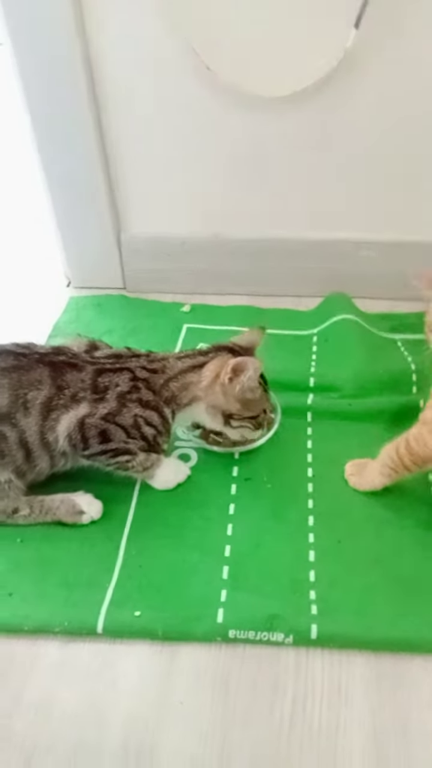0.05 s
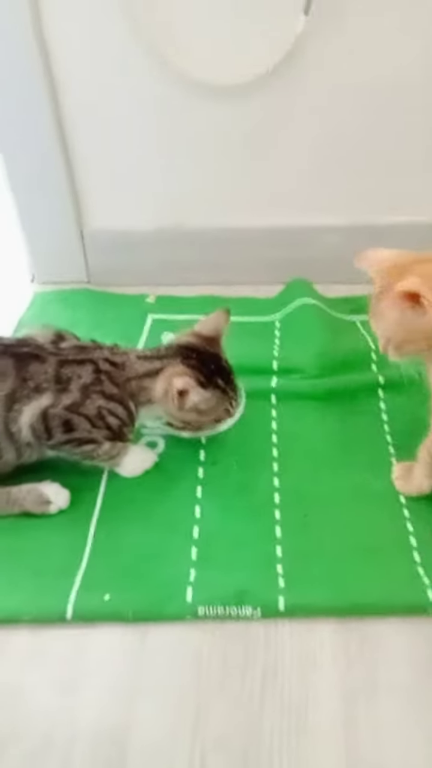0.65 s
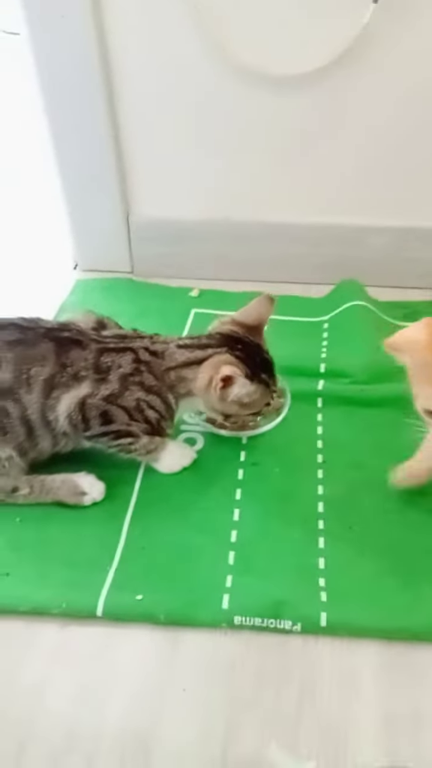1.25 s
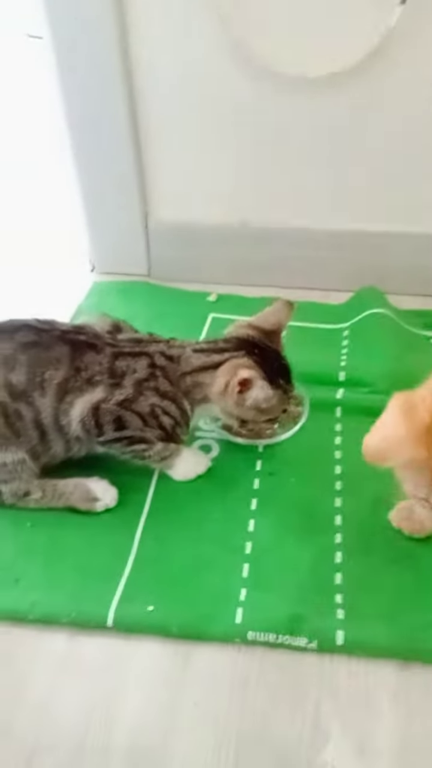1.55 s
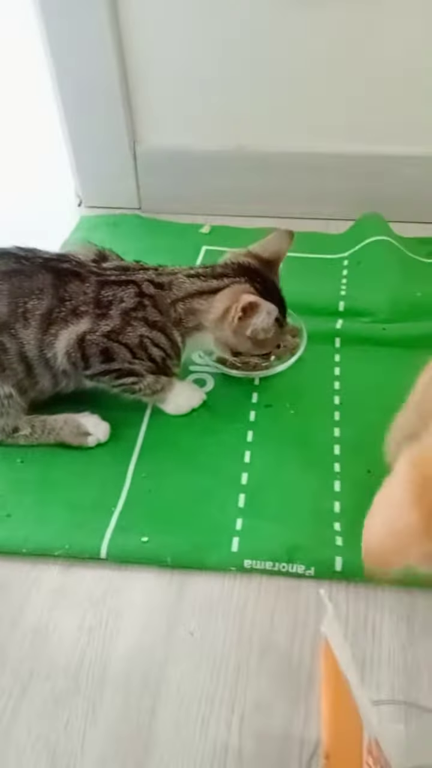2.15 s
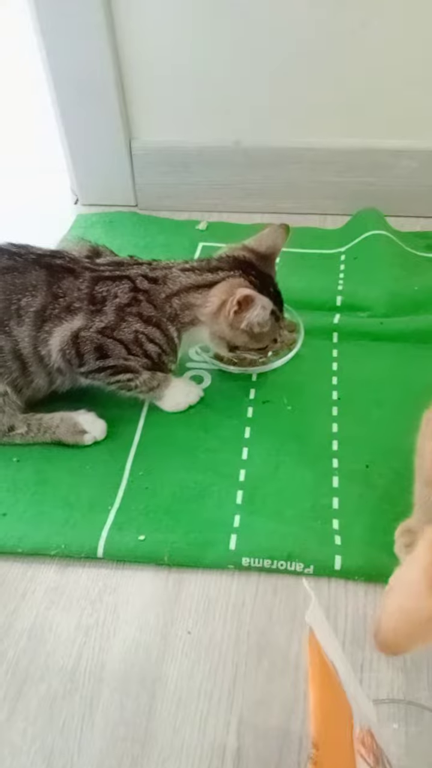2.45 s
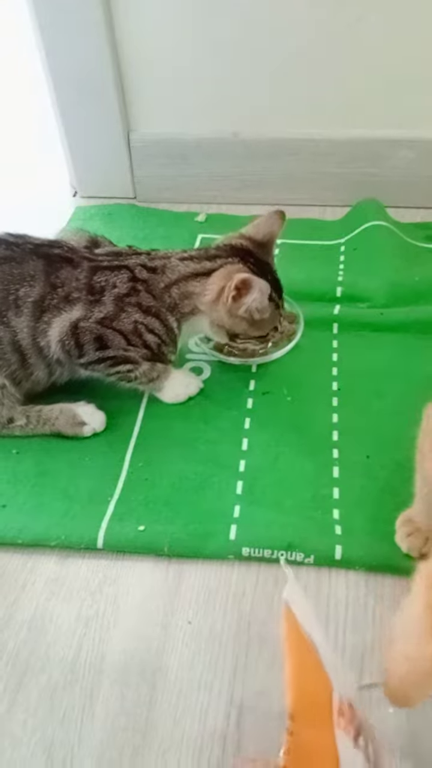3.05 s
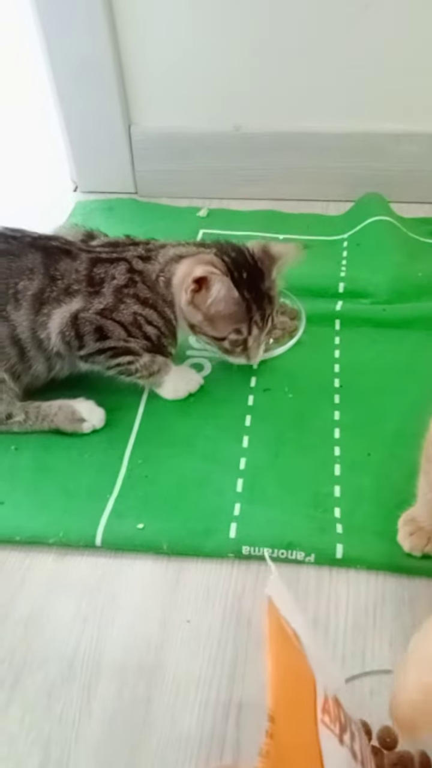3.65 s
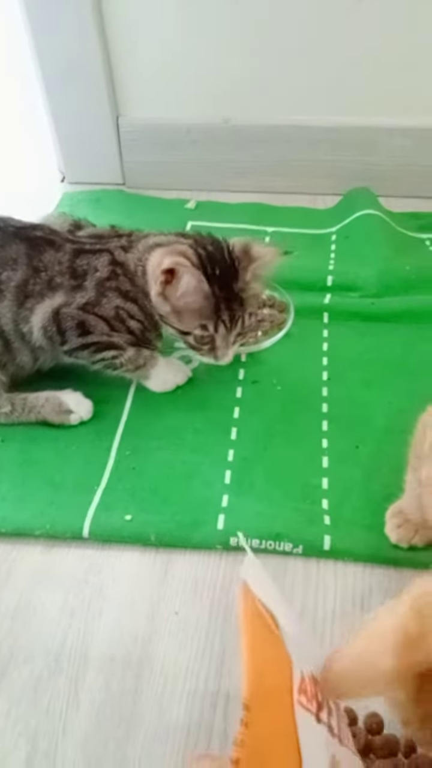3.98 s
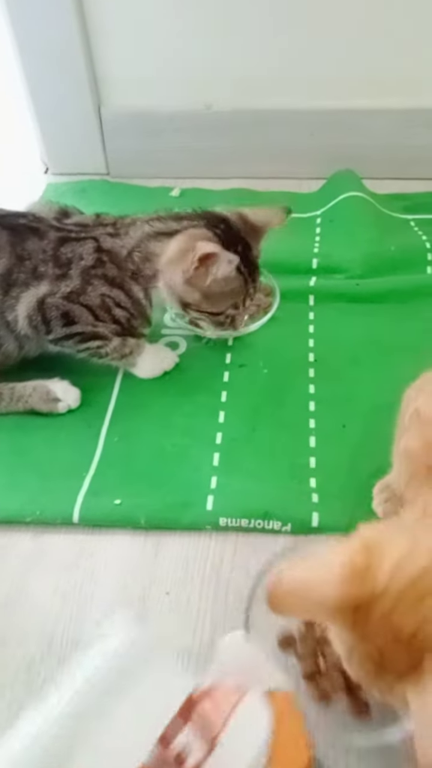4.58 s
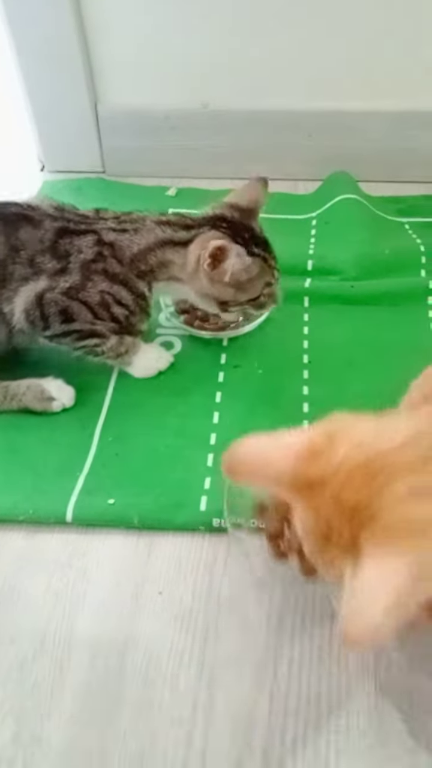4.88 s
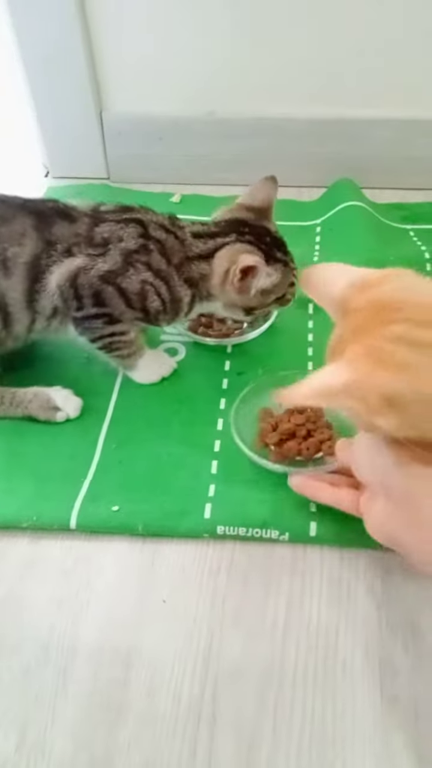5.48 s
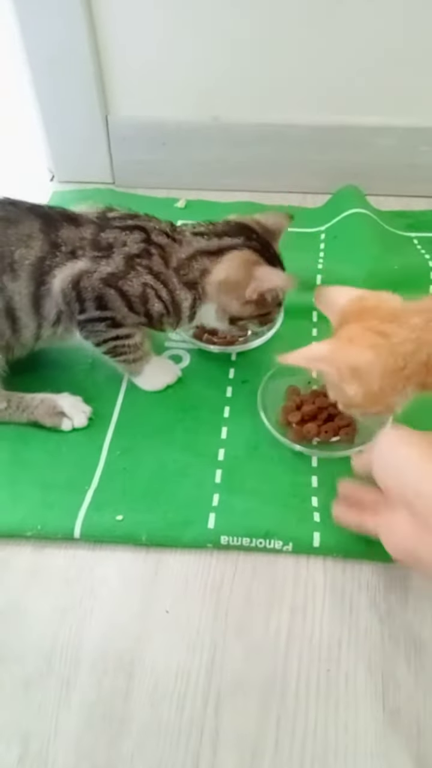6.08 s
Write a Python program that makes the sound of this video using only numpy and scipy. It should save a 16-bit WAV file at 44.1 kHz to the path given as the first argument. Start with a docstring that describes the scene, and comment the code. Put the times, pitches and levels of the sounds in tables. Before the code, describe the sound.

A stiff plastic bag rustles, then crinkles and pops sharply as it is tipped. Dry cat food scrapes along the plastic and drops into a small glass bowl, each pellet ticking with a short, bright ring. The pour thins out, and a few light knocks and faint rustles follow as the bag is put aside and the bowl is carried. The microphone picks up slight echoes and a steady hush from a bare room.

```python
"""Dry cat food pours from a stiff plastic bag into a small glass bowl: each pellet ticks and rings the glass.
The kibble scrapes along the film and drums on the bag wall; folds crinkle and the wall pops as it buckles.
Then the bag is put aside and the bowl is carried to a mat, with a few knocks and a faint rumble.
A bare, hard-walled room adds echoes and a steady hush."""
import sys
import numpy as np
from scipy import signal
from scipy.fft import rfft, irfft, next_fast_len
from scipy.io import wavfile
from scipy.ndimage import uniform_filter1d

SR = 44100
rng = np.random.default_rng(int(sys.argv[2]) if len(sys.argv) > 2 else 0)


def output_pcm(signal):
    """Save a mono or channel-first signal as 16-bit PCM at the path in sys.argv[1].

    Samples are clipped to [-1, 1] before scaling.
    """
    pcm = np.clip(np.atleast_2d(signal).T, -1, 1) * 32767
    wavfile.write(sys.argv[1], SR, np.round(pcm).astype(np.int16))


N = 278735
TIME_S, HIT_TIME_S = np.arange(N) / SR, np.arange(SR // 8) / SR
CUTOFF_HZ = 15700


# Glass modes, each split into a pair by the uneven wall: pitch_hz, split_hz, base_t60_s
BOWL_MODES = [(2175, 60, .06), (5020, 45, .06), (8625, -45, .05), (10127, -45, .05), (12200, -130, .045),
              (15224, -60, .055)]
# Relative strength of each mode by spot struck: bottom_db, rim_db
MODE_RESPONSE = [(-14.5, -15), (9, -40.5), (0.5, -29.5), (-27, 5.5), (-17, -9), (-11, -22)]
# Pellet tick spectrum: freq_hz, gain_db
TICK_SPECTRUM = [(300, -48), (800, -53), (1500, -15), (2200, 1), (3600, 1.5), (5500, -4.5), (8000, -5.5),
                 (9700, 1.5), (11500, -28), (15500, -14)]
# Pellets on glass, levels before trim: start_s, tick_db, ring_db, spot (0 bottom, 1 rim)
PELLET_HITS = [(1.9577, -38.5, -30, 0.06), (2.0382, -40, -53, 0.47), (2.0829, -55, -28, 0.67),
               (2.0994, -41.5, -30, 0.88), (2.202, -38, -31.5, 0.54), (2.4567, -36.5, -24.5, 1),
               (2.5097, -35, -34.5, .02), (2.5736, -50, -40.5, .05), (2.612, -49.5, -39, 0.052),
               (2.6785, -47, -38.5, 0.65), (2.7107, -44.5, -42, 0.4), (2.7365, -47.5, -34.5, 1),
               (2.758, -51, -46, .8), (2.9553, -45, -46.5, .85), (3.019, -40, -29, 0.38),
               (3.0645, -46, -42, 0.84), (3.162, -39, -40.5, 0.44), (3.249, -44.5, -37.5, 0.061),
               (3.3013, -43, -33, 1), (3.364, -52, -45, 0.83), (3.406, -51.5, -37, 1), (3.418, -57, -38, 1),
               (4.001, -45.5, -47.5, .75), (4.0771, -40, -43.5, 0.26), (4.1856, -49.5, -50, 0.16)]


def pellet_clinks(tick_trim_db=2.5, ring_trim_db=-1.0, scatter_db=3.0, twin_gain=0.66, t60_scale=0.73):
    """A pellet ticks and sets the bowl's paired modes beating; the spot it hits decides their balance."""
    out, t = np.zeros(N), HIT_TIME_S
    bottom_db, rim_db = np.transpose(MODE_RESPONSE)
    onset = 1 - np.exp(-t / 0.00039)
    for start_s, tick_db, ring_db, spot in PELLET_HITS:
        contact = crack_burst(t60_s=0.017, ragged_db=6.5, first_gain=1.7)
        tick = bandpass(colour(contact, TICK_SPECTRUM), 320, 10000)
        clink = from_db(tick_db + tick_trim_db) * unit_attack(tick)
        shares = from_db(bottom_db + spot * (rim_db - bottom_db) + rng.normal(0, scatter_db, len(rim_db)))
        for (hz, split_hz, t60_s), share in zip(BOWL_MODES, shares / np.linalg.norm(shares)):
            twin = twin_gain * np.sin(2 * np.pi * ((hz + split_hz) * t + rng.random()))
            pair = (np.sin(2 * np.pi * hz * t) + twin) * decay(t, t60_s * t60_scale) * onset
            clink += share * from_db(ring_db + ring_trim_db) * unit_attack(pair)
        add(out, start_s, clink)
    return out


# Ring of each bowl mode at unit flow: level_db
PATTER_LEVELS = [-62, -68.5, -68.5, -61.5, -72, -70]


def bowl_patter(rate_per_s=41, spread_db=5.5):
    """Pellets roll and resettle in the bowl; each touch strikes every mode with a strength of its own."""
    touches = (rng.random(N) < rate_per_s / SR) * contact_sizes(spread_db)
    glass = np.zeros(N)
    for (hz, _, t60_s), level_db in zip(BOWL_MODES, PATTER_LEVELS):
        glass += from_db(level_db) * unit_rms(ring(touches * rng.standard_normal(N), hz, t60_s))
    return glass * np.sqrt(kibble_flow()) * gate(start_s=1.95, end_s=4.2, fade_s=0.078)


# Strength of the kibble's sliding: time_s, relative_db
FLOW_CURVE = [(0, -74), (0.55, -70), (0.66, -57.5), (0.8, -67.5), (0.96, -54.5), (1.25, -57), (1.41, -49.5),
              (1.68, -48.5), (1.8, -36.5), (2.05, -43.5), (2.18, -39.5), (2.41, -59.5), (2.54, -46.5),
              (3.06, -43.5), (3.2, -49), (3.28, -39.5), (3.44, -53), (3.8, -51), (4.19, -56), (4.78, -60),
              (4.97, -56), (5.25, -58), (5.8, -62.5), (5.93, -56), (6.32, -61)]


def kibble_flow(rest_db=-67.5, steady_db=-45):
    """Flow of kibble, about 1 at a steady pour; below the resting level the pellets lie still."""
    motion = from_db(np.interp(TIME_S, *np.transpose(FLOW_CURVE)))
    return np.maximum(motion - from_db(rest_db), 0) / from_db(steady_db)


# Kibble scraping on film: freq_hz, gain_db
SCRAPE_SPECTRUM = [(60, -6.5), (160, -12), (240, -2), (350, -12.5), (560, -5), (780, -1), (1450, -3),
                   (2300, 0), (3500, 0), (5500, -3.5), (7800, -8.5), (9700, 3.5), (11200, -10),
                   (15500, -18)]


def kibble_slide(body_db=-55, rattle_db=-50, fizz_db=-54, wall_db=-57.5, click_db=-54.5, shared=0.53):
    """Pellets scrape over the film in a dense crackle, bump the bag wall and click against each other."""
    flow = kibble_flow()
    body_flow, fizz_flow = flow ** 0.85, flow ** 0.97
    registers = [(50, 1300, body_flow * from_db(body_db)),
                 (1300, 7000, flow * from_db(rattle_db)),
                 (7000, 16000, fizz_flow * from_db(fizz_db))]
    common_power = grain_power(rate_per_s=270, spread_db=6.5, t60_s=0.028)
    out = np.zeros(N)
    for low_hz, high_hz, gain in registers:
        own_power = grain_power(rate_per_s=600, spread_db=8.0, t60_s=0.022)
        crackle = np.sqrt(shared * common_power + (1 - shared) * own_power) * rng.standard_normal(N)
        out += gain * unit_rms(bandpass(colour(crackle, SCRAPE_SPECTRUM), low_hz, high_hz))
    out += body_flow * from_db(wall_db) * tumble(low_hz=517, high_hz=933, rate_per_s=100, cycles=33)
    out += flow * from_db(click_db) * tumble(low_hz=2080, high_hz=4000, rate_per_s=170, cycles=45)
    return out


def grain_power(rate_per_s, spread_db, t60_s):
    """Power of tiny random contacts, evened out to a mean near 1."""
    contacts = contact_sizes(spread_db, cap=4) ** 2 * (rng.random(N) < rate_per_s / SR)
    power = signal.lfilter([1], [1, -decay(2 / SR, t60_s)], contacts + 1e-9)
    return power / uniform_filter1d(power, size=SR // 14)


def tumble(low_hz, high_hz, rate_per_s, cycles):
    """Pellets bump each other or the bag wall, each ringing at one of 16 pitches; evened to rms 1."""
    bumps = contact_sizes(spread_db=4.0) * (rng.random(N) < rate_per_s / SR)
    pitches_hz = np.geomspace(low_hz, high_hz, 16)
    choice = rng.integers(0, len(pitches_hz), N)
    rings = sum(ring(bumps * (choice == k), hz, cycles / hz) * (-1) ** k
                for k, hz in enumerate(pitches_hz))
    power = uniform_filter1d(rings ** 2, size=SR // 10)
    return unit_rms(rings / np.sqrt(np.abs(power) + 0.1 * power.mean()))


# Bag film spectrum: freq_hz, gain_db
FILM_SPECTRUM = [(150, -18), (250, -2), (400, -10), (700, -6.5), (1300, -7), (2200, 1.5), (3600, 2),
                 (5500, -6.5), (7600, -12), (9700, -3.5), (11000, -15.5), (15500, -19)]
# Film snaps and handling scuffs: start_s, level_db, centre_hz, falloff_db_per_octave, t60_s
FILM_SNAPS = [(0.6165, -56.5, 1200, 7.5, 0.014), (0.6411, -51.5, 10800, 8, 0.023),
              (0.8572, -53.5, 1500, 2.5, .06), (0.9724, -43.5, 9100, 22, 0.013),
              (1.106, -55.5, 10700, 19, 0.017), (1.21, -39, 5750, 5, 0.022), (1.285, -44, 850, 10.5, .044),
              (1.318, -39.5, 10700, 9.5, 0.02), (1.4278, -39, 600, 7, 0.022),
              (1.5081, -39.5, 600, 4, 0.068), (1.5588, -41.5, 600, 2.5, 0.057),
              (1.6246, -48, 600, 3, 0.024), (1.67, -48, 12000, 3, .027), (1.7077, -18.5, 8000, 4, 0.029),
              (1.722, -39, 4550, 13, 0.093), (1.766, -35.5, 4560, 5, 0.024),
              (1.7857, -30.5, 2940, 4, 0.033), (1.791, -29, 10500, 13, 0.013),
              (1.8366, -40, 12000, 10, 0.031), (1.8691, -28.5, 9300, 15.5, 0.027),
              (1.872, -33.5, 8600, 32, 0.21), (1.9972, -38, 2900, 12, 0.0071),
              (2.0988, -28.5, 3080, 6, 0.032), (2.117, -32, 3000, 6, 0.048), (2.1557, -38, 9000, 3, .04),
              (2.16, -23.5, 7100, 3, .055), (2.296, -42, 9600, 4.5, 0.085), (2.364, -46, 600, 3.5, 0.031),
              (2.5878, -36, 3060, 4.5, 0.086), (2.8408, -40.5, 800, 7, 0.037),
              (2.851, -43, 784, 15.5, 0.048), (2.914, -48, 3200, 29, 0.048), (3.3952, -45, 900, -4, 0.04),
              (3.7466, -46, 10800, 1, 0.031), (4.266, -50.5, 800, 9, 0.12), (4.6055, -51, 814, 7.5, 0.049),
              (5.0752, -58, 600, 8.5, 0.068), (5.889, -50, 557, 6, 0.2), (6.052, -52, 9450, 12, 0.14),
              (6.064, -50, 4900, 17, 0.2), (6.1588, -54.5, 7100, 7, 0.011)]


def bag_crinkles():
    """Each fold that gives way cracks with the colour of the film, tilted about a pitch of its own."""
    out = np.zeros(N)
    grid_hz = np.geomspace(100, CUTOFF_HZ, 60)
    for start_s, level_db, centre_hz, falloff, t60_s in FILM_SNAPS:
        gains_db = at_hz(FILM_SPECTRUM, grid_hz) - falloff * np.abs(np.log2(grid_hz / centre_hz))
        burst = crack_burst(t60_s, ragged_db=1.5, first_gain=1.8)
        snap = colour(burst, np.column_stack([grid_hz, gains_db]))
        add(out, start_s, from_db(level_db) * unit_attack(bandpass(snap, 200, CUTOFF_HZ)))
    return out


# Hollow pops of the bag wall: start_s, peak_db, pitch_hz, t60_s
WALL_POPS = [(1.5031, -20, 595, 0.0099), (1.506, -39.5, 281, 0.047), (1.766, -33.5, 570, 0.031),
             (1.868, -40.5, 480, 0.022), (1.933, -35, 557, 0.043)]


def bag_pops(rise_s=0.00042):
    """The bag wall buckles and the air inside rings for a few cycles."""
    out, t = np.zeros(N), HIT_TIME_S
    onset = (1 - np.exp(-t / rise_s)) ** 2
    for start_s, peak_db, hz, t60_s in WALL_POPS:
        swing = -np.sin(2 * np.pi * hz * t) * decay(t, t60_s) * onset
        add(out, start_s, from_db(peak_db) * swing / np.abs(swing).max())
    return out


# Knocks of bag and bowl, levels before trim:
# start_s, crack_db, crack_t60_s, dull_above_hz, ring_cycles, 3 x (pitch_hz, mode_db)
HANDLING_HITS = [(3.7936, -31, 0.02, 6100, 7.5, 1540, -54.5, 2130, -33, 3480, -45),
                 (4.2812, -37, 0.019, 5200, 12, 1690, -42.5, 2060, -40.5, 3070, -46),
                 (4.8093, -68, 0.033, 12000, 30, 2160, -54, 10100, -58, 11200, -54),
                 (5.2022, -74, 0.053, 4000, 6.4, 1230, -47.5, 2400, -47.5, 4640, -49),
                 (5.223, -64, 0.15, 4040, 17, 1280, -52.5, 2800, -45, 5740, -40),
                 (5.3318, -53, 0.018, 6860, 56, 3030, -45, 4700, -54, 10700, -49),
                 (5.4683, -92, 0.095, 9000, 50, 4550, -71, 5000, -55, 5800, -54.5)]


def handling_knocks(crack_trim_db=1.0, ring_trim_db=0.6, dull_db_per_octave=12):
    """A rough hard contact excites three damped resonances; softer contacts lose their treble."""
    out = np.zeros(N)
    for start_s, crack_db, t60_s, dull_hz, cycles, *modes in HANDLING_HITS:
        contact = crack_burst(t60_s, ragged_db=0.5, first_gain=3.0)
        dulled = [(hz, db - dull_db_per_octave * max(np.log2(hz / dull_hz), 0))
                  for hz, db in FILM_SPECTRUM]
        crack = bandpass(colour(contact, dulled), 480, CUTOFF_HZ)
        knock = from_db(crack_db + crack_trim_db) * unit_attack(crack)
        for hz, mode_db in zip(modes[::2], modes[1::2]):
            knock += from_db(mode_db + ring_trim_db) * unit_attack(ring(crack, hz, cycles / hz))
        add(out, start_s, knock)
    return out


def bag_drumming(level_db=-57):
    """Clumps of kibble bump the hollow bag while it is tipped steeply."""
    bumps = tumble(low_hz=600, high_hz=820, rate_per_s=30, cycles=48)
    return from_db(level_db) * gate(start_s=2.55, end_s=3.32, fade_s=0.039) * bumps


def carrying_rumble(level_db=-74.5):
    """Soft low handling noise while the bowl is carried."""
    rumble = unit_rms(bandpass(rng.standard_normal(N), 200, 290))
    return from_db(level_db) * gate(start_s=4.03, end_s=5.84, fade_s=0.34) * rumble


# Room decay: freq_hz, t60_s
ROOM_DECAY = [(200, 0.8), (600, 0.32), (1500, 0.43), (4000, 0.31), (9000, 0.39), (15000, 0.22)]


def room_response(tail_db=-7, tail_delay_s=0.0051, wall_db=-15, wall_delay_s=0.012, wall_t60_s=0.024):
    """A scattered echo from the near wall and a diffuse tail that dies sooner in the treble."""
    t = np.arange(SR // 2) / SR
    edges_hz = np.geomspace(80, 18000, 9)
    tail = np.zeros(len(t))
    for low_hz, high_hz in zip(edges_hz, edges_hz[1:]):
        t60_s = at_hz(ROOM_DECAY, np.sqrt(low_hz * high_hz))
        tail += bandpass(rng.standard_normal(len(t)), low_hz, high_hz) * decay(t, t60_s)
    tail *= t > tail_delay_s
    wall = rng.standard_normal(len(t)) * decay(t - wall_delay_s, wall_t60_s) * (t > wall_delay_s)
    return from_db(tail_db) * tail / np.linalg.norm(tail) + from_db(wall_db) * wall / np.linalg.norm(wall)


def room_echoes(direct, stretches=14):
    """The hand-held microphone keeps drifting, so each stretch of sound meets another pattern of echoes."""
    out = np.zeros(N)
    for stretch in np.array_split(np.arange(N), stretches):
        add(out, stretch[0] / SR, signal.fftconvolve(direct[stretch], room_response()))
    return out


# Room noise spectrum: freq_hz, gain_db
HUSH_SPECTRUM = [(57, 2), (120, -0.5), (190, -5), (400, -4.5), (750, -5.5), (1100, -12), (2700, -14.5),
                 (3600, -11.5), (5900, -19), (7000, -14.5), (7900, -32.5), (9500, -11.5), (11500, -27),
                 (15500, -33.5)]
# Narrow humps in the room noise: centre_hz, width_hz, boost_db
HUSH_RESONANCES = [(61, 5.7, 5.5), (783, 21, 9.5), (1153, 35, 9), (2267, 40, 10.5), (3426, 45, 10),
                   (3730, 52, 7), (4430, 88, 7.5), (7470, 440, 5.5)]


def room_hush(level_db=-61.5):
    """Steady room noise, lifted by a few narrow resonances."""
    noise = colour(rng.standard_normal(N), HUSH_SPECTRUM)
    for hz, width_hz, boost_db in HUSH_RESONANCES:
        hump = signal.lfilter(*signal.iirpeak(hz, hz / width_hz, fs=SR), noise)
        noise += (from_db(boost_db) - 1) * hump
    return from_db(level_db) * unit_rms(noise)


def crack_burst(t60_s, ragged_db, first_gain):
    """One sharp crack, then a quickly dying crowd of uneven ones."""
    size = len(HIT_TIME_S)
    strength = np.repeat(from_db(ragged_db * rng.standard_normal(size)), 8)[:size]
    crowd = rng.standard_normal(size) * unit_rms(strength)
    crowd[0] = first_gain
    return crowd * decay(HIT_TIME_S, t60_s)


def contact_sizes(spread_db, cap=3):
    """Random gains, many weak and a few strong."""
    return from_db(spread_db * np.minimum(rng.exponential(1, N), cap))


def ring(clicks, hz, t60_s):
    """Each click sets a damped sine ringing."""
    radius, step_rad = decay(1 / SR, t60_s), 2 * np.pi * hz / SR
    feedback = [1, -2 * radius * np.cos(step_rad), radius ** 2]
    return signal.lfilter([0, np.sin(step_rad)], feedback, clicks + 1e-18)


def colour(x, spectrum):
    """Minimum-phase filter: nothing sounds before its cause."""
    size = 2 * next_fast_len(len(x))
    gains = from_db(at_hz(spectrum, np.arange(size // 2 + 1) * SR / size))
    cepstrum = irfft(np.log(gains))
    cepstrum[1:size // 2] *= 2
    cepstrum[size // 2 + 1:] = 0
    return irfft(rfft(x, size) * np.exp(rfft(cepstrum)))[:len(x)]


def bandpass(x, low_hz, high_hz):
    return signal.sosfilt(signal.butter(3, [low_hz, high_hz], "band", fs=SR, output="sos"), x)


def at_hz(table, hz):
    """Read a table on a log-frequency axis."""
    known_hz, values = np.transpose(table)
    return np.interp(np.log(np.maximum(hz, 1)), np.log(known_hz), values)


def from_db(db):
    return 10 ** (np.asarray(db) / 20)


def unit_rms(x):
    return x / np.sqrt(np.mean(x ** 2) + 1e-20)


def unit_attack(x, attack_s=0.01):
    """Scale a hit so that its attack has rms 1."""
    return x / np.sqrt(np.mean(x[:int(attack_s * SR)] ** 2) + 1e-20)


def decay(t, t60_s):
    return np.exp(-np.log(1000) * t / t60_s)


def gate(start_s, end_s, fade_s):
    return np.clip(np.minimum(TIME_S - start_s, end_s - TIME_S) / fade_s, 0, 1)


def add(track, start_s, sound):
    start = int(start_s * SR)
    track[start:start + len(sound)] += sound[:max(N - start, 0)]


def scene():
    """Bag, kibble and bowl in the room, over its faint steady hush."""
    direct = bag_crinkles() + pellet_clinks() + bowl_patter() + handling_knocks()
    direct += bag_pops() + kibble_slide() + bag_drumming() + carrying_rumble()
    return (direct + room_echoes(direct) + room_hush())[None]


def record(dry):
    """The small microphone drops the deep bass; the top is cut steeply."""
    thin = signal.sosfilt(signal.butter(6, 50, "high", fs=SR, output="sos"), dry)
    return signal.sosfilt(signal.ellip(10, 0.2, 75, CUTOFF_HZ, fs=SR, output="sos"), thin)


dry = scene()
out = record(dry)
output_pcm(out)
```